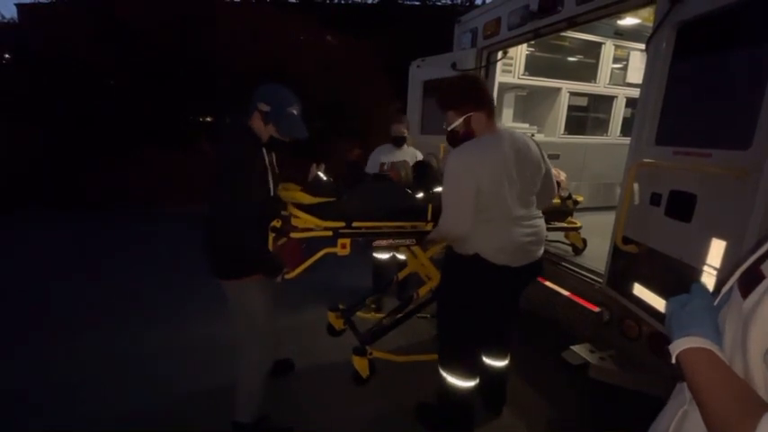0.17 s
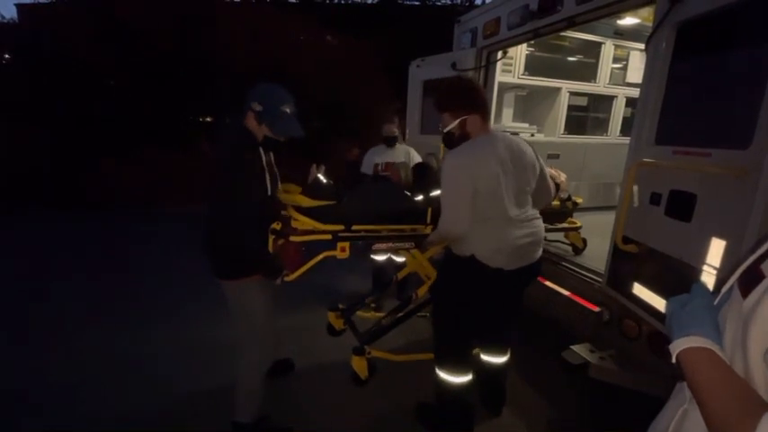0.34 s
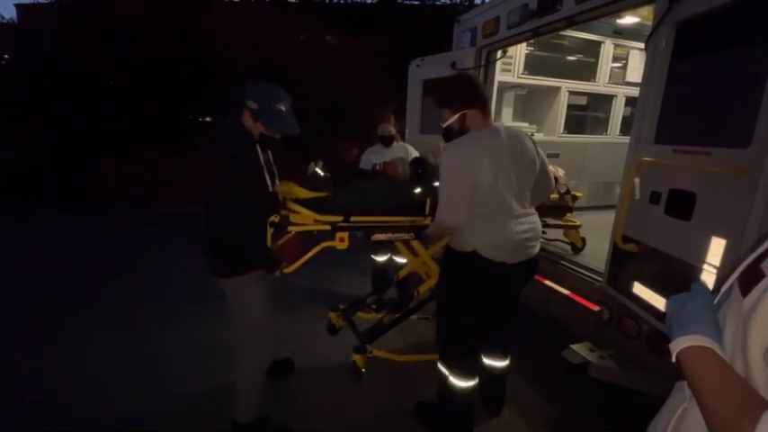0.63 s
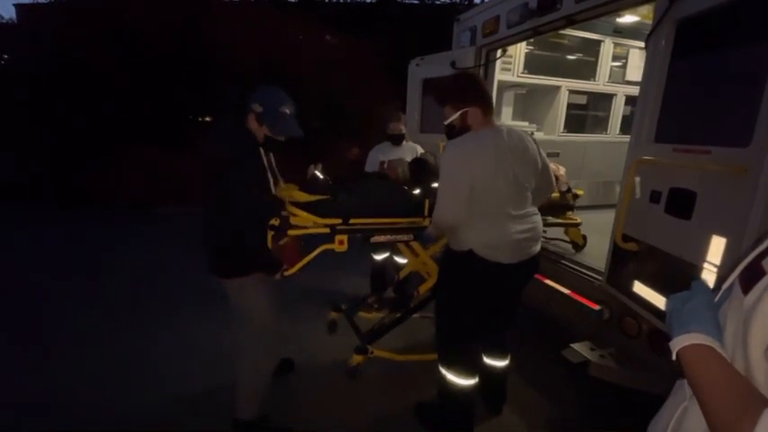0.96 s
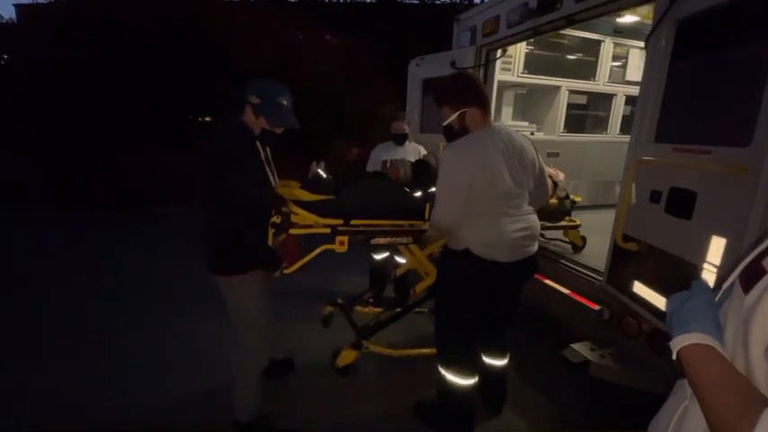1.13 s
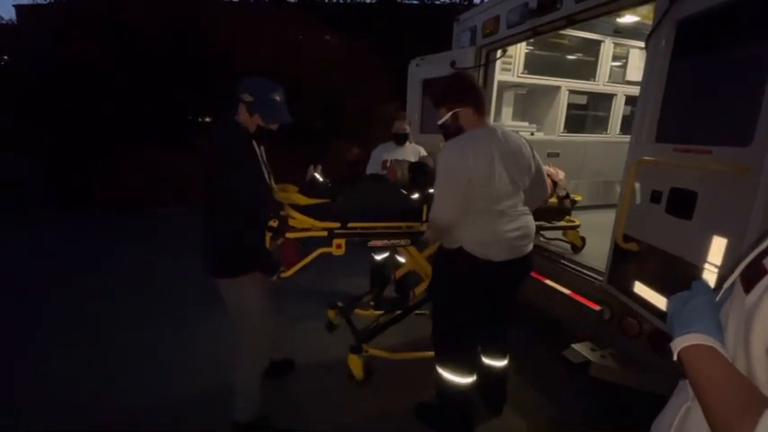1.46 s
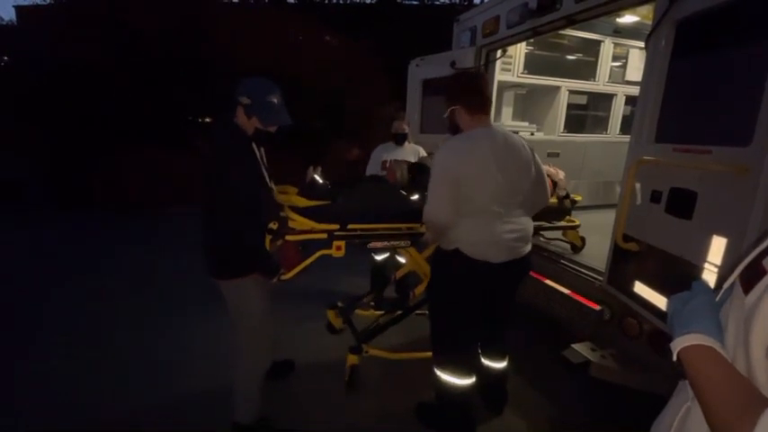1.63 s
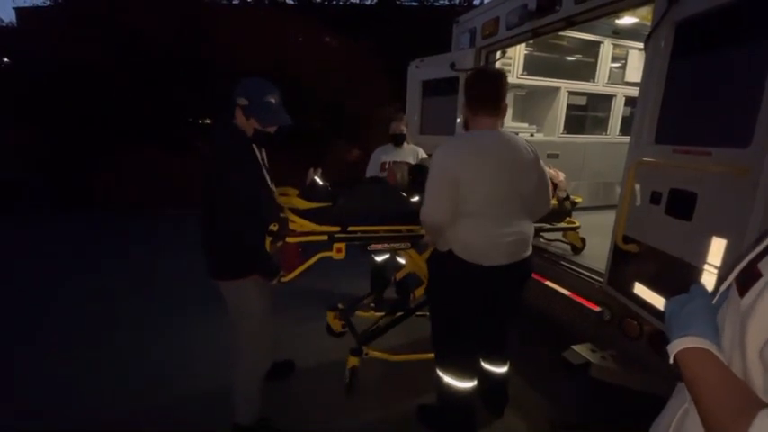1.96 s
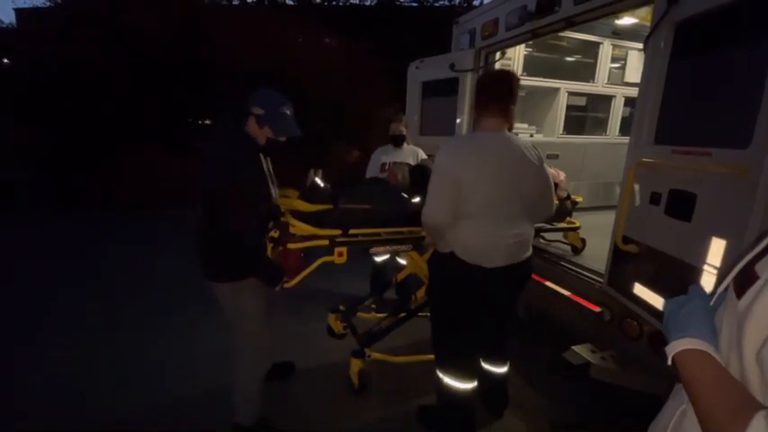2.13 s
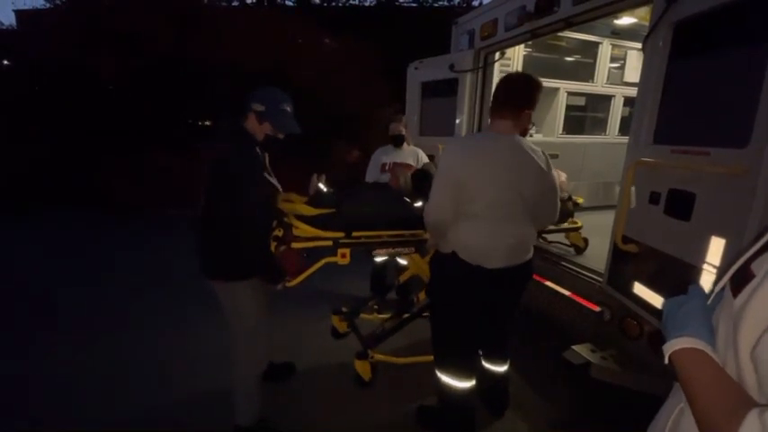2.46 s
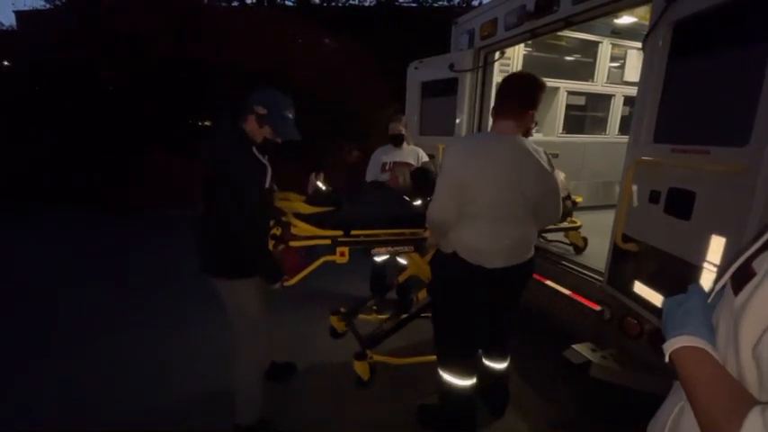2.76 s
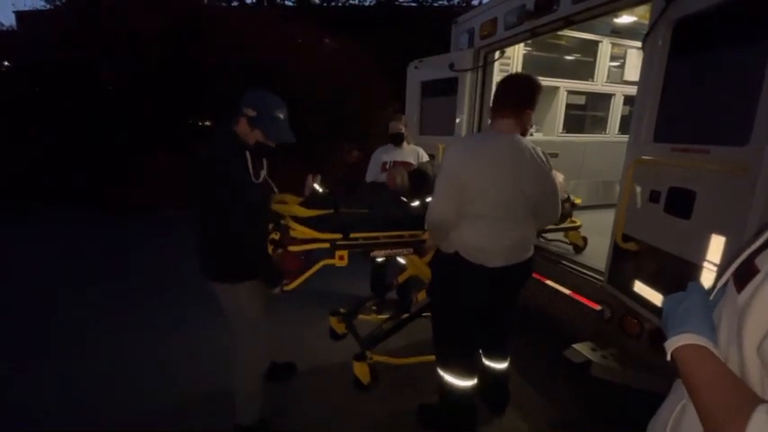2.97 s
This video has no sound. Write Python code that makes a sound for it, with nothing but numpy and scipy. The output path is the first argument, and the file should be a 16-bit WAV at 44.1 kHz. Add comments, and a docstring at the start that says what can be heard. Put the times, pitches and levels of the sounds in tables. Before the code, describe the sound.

A metal wheeled stretcher knocks lightly, then clatters heavily with clinks, short groans and a hollow thump; after a lull, a denser rattling burst follows. Outdoors by an open ambulance, close stereo microphone, low rumble.

```python
"""A wheeled metal stretcher is pushed into the back of an ambulance, over a low outdoor rumble throughout.
At first sparse knocks, each a run of contacts, excite the frame, its joints and tubes; light ticks are noise.
From about 0.5 s the knocks crowd; fittings clink on three modes, gliding tones groan, the hollow floor booms.
After a lull from 1.3 s the knocks return at 2 s in a dense burst that ends near 3 s.
Loose parts rattle under and between the knocks, and the open cabin adds a short tail to the frame's sound."""
import sys
import numpy as np
from scipy import signal
from scipy.io import wavfile

SR = 44100
rng = np.random.default_rng(int(sys.argv[2]) if len(sys.argv) > 2 else 0)


def inscribe(sig):
    """Save sig as 16-bit PCM at rate SR to the path in sys.argv[1].

    A 1-D sig is mono; a 2-D sig holds one channel per row.
    Samples are clipped to [-1, 1] before scaling.
    """
    pcm = np.round(np.clip(np.atleast_2d(sig).T, -1, 1) * 32767)
    wavfile.write(sys.argv[1], SR, pcm.astype(np.int16))


N = 136710   # length in samples

# Outdoor rumble spectrum. Each row: frequency in Hz, relative density in dB.
RUMBLE_SPECTRUM = [(25, -48), (50, -8), (80, 1), (110, -5.5), (160, -6), (300, -18), (600, -24.5),
                   (1400, -40), (3500, -49), (4760, -46.5), (6200, -63), (8200, -41.5), (10700, -61),
                   (14000, -72)]
# Stereo field. Each row: frequency in Hz, left-right correlation from 0 to 1, left minus right in dB.
STEREO_FIELD = [(39.3, 0.64, 1), (130, 0.91, -2), (404, 1, -1.5), (700, 0, 2), (1260, 0, 5.5),
                (2630, 0.77, -2.5), (3870, 0, 1), (6130, 0.25, 6), (8800, 0.092, -7.5), (11600, 0, 1.5)]
# Knocks of the frame. Each row: start in seconds, force in dB in the clack, thud, clank and click
# registers, swell time in seconds.
KNOCKS = [(0.0, -36, -36.5, -44, -45.5, 0.0019), (0.1931, -41, -34.5, -62, -88, 0.011),
          (0.266, -40.5, -48, -73, -65, 0.0019), (0.329, -39.5, -43.5, -72, -69, 0.002),
          (0.468, -41.5, -39.5, -41.5, -44.5, 0.0028), (0.5078, -37.5, -38, -35.5, -58, 0.0059),
          (0.5226, -35, -28, -36.5, -49, 0.019), (0.6486, -34, -30, -29, -55, 0.032),
          (0.6762, -29, -32.5, -26, -64, 0.0045), (0.6825, -29, -18.5, -31.5, -39.5, 0.0099),
          (0.7565, -61, -27, -70, -46.5, 0.0016), (0.787, -31.5, -44, -39.5, -42.5, 0.0056),
          (0.816, -52, -31, -33, -43, 0.0015), (0.8346, -28, -30, -31, -37.5, 0.011),
          (0.916, -20.5, -22, -21, -55, 0.0054), (0.9223, -19, -41, -27, -23.5, 0.0035),
          (1.0078, -25.5, -44, -43, -68, 0.007), (1.023, -40, -27, -34, -72, 0.004),
          (1.05, -28.5, -29, -26.5, -70, 0.0067), (1.0746, -31, -33, -33, -32, 0.0064),
          (1.0938, -27, -33.5, -31, -28, 0.0042), (1.1415, -38.5, -37, -34.5, -52, 0.0026),
          (1.253, -22.5, -32, -35, -52, 0.0034), (1.263, -33, -34, -34.5, -38, 0.0078),
          (2.041, -35.5, -43, -45.5, -38.5, 0.011), (2.087, -33, -43, -39.5, -67, 0.0026),
          (2.0984, -26.5, -27.5, -31.5, -32, 0.0035), (2.1206, -24.5, -26, -28, -42, 0.0063),
          (2.1362, -23.5, -29.5, -30.5, -26, 0.0028), (2.2178, -29, -29.5, -37.5, -39, 0.0081),
          (2.2525, -25, -59, -33, -64, 0.002), (2.2812, -30.5, -63, -40, -36, 0.0074),
          (2.3207, -29, -45, -36, -35, 0.0063), (2.3467, -23.5, -37, -35, -36.5, 0.003),
          (2.3602, -22, -24, -24.5, -37, 0.014), (2.38, -19.5, -24, -21, -21, 0.0033),
          (2.393, -40, -20.5, -24.5, -24, 0.00073), (2.436, -30.5, -40, -47, -39.5, 0.0028),
          (2.4863, -27, -29.5, -29, -35.5, 0.017), (2.561, -25.5, -48, -33, -35, 0.004),
          (2.58, -22, -36, -27, -33, 0.0029), (2.591, -30, -29.0, -31, -32, 0.0096),
          (2.6201, -19, -20.5, -20.5, -25, 0.003), (2.6256, -19.5, -17.5, -22.5, -24.5, 0.002),
          (2.6336, -36, -28, -24, -19.5, 0.0066), (2.7038, -32, -34.5, -29.5, -33.5, 0.0075),
          (2.73, -24.5, -31, -37, -50, 0.0027), (2.7392, -31, -38, -26, -35.5, 0.0054),
          (2.793, -25.5, -49, -42, -31, 0.0039), (2.81, -20, -30.5, -23.5, -32.5, 0.0045),
          (2.8384, -20.5, -25, -25.5, -28, 0.0025), (2.8418, -25.5, -21.5, -24, -21.5, 0.0092),
          (2.924, -25, -28, -31.5, -37.5, 0.03), (3.0134, -27.5, -32.5, -33.5, -41.5, 0.0054)]
# Loose rattle over time. Each row: time in seconds, level in dB before its colour.
RATTLE_LEVEL = [(0, -43), (0.15, -54.5), (0.43, -58), (0.6, -48), (1.15, -45.5), (1.47, -58.5),
                (1.9, -59.5), (2.2, -46), (2.75, -43), (3.1, -67)]
# Colour of the rattle. Each row: frequency in Hz, gain in dB.
RATTLE_COLOUR = [(200, 0.5), (1000, 2.5), (10000, -7.5)]
# Crowded modes of the frame. Each row: frequency in Hz, gain in dB, t60 in seconds, cabin tail in dB.
FRAME_RESPONSE = [(42.4, -22.5, 0.14, -6), (76, -15.5, 0.11, 4), (224, -8, 0.093, -2),
                  (320.7, -1.5, 0.041, -8), (462, -14.5, 0.035, 0.5), (640, -6, 0.073, -7),
                  (1200, -7, 0.04, -3.5), (1800, -12.5, 0.025, -2), (3900, -12.5, 0.05, 1),
                  (6200, -5.5, 0.019, -4), (10640, -7, 0.019, -3), (13500, -13, 0.031, -10)]
# Reverberation of the cabin. Each row: frequency in Hz, t60 in seconds.
CABIN_DECAY = [(200, 0.4), (12000, 0.25)]
# Ringing modes of the tubes. Each row: frequency in Hz, gain in dB, t60 in seconds.
TUBE_MODES = [(910, -49, 0.077), (1740, -17, 0.07), (2382, -12, 0.13), (3253, -16, 0.08),
              (4630, -14.5, 0.04), (4906, -14, 0.025), (6320, -21, 0.067), (7020, -15.5, 0.27)]
# Ticks of small buckles and catches. Each row: start in seconds, gain in dB.
TICKS = [(0.071, -32.5), (0.353, -36), (0.58, -32.5), (1.315, -35.5), (1.44, -37.5), (1.53, -47),
         (1.955, -41.5)]
# Clinks of latches and small fittings. Each row: start in seconds, pitch in Hz, gain in dB.
CLINKS = [(0.51, 3240, -29), (0.528, 2780, -37), (0.678, 3180, -23), (0.789, 1390, -31), (0.921, 2340, -17),
          (1.01, 3170, -25.5), (1.03, 3320, -26), (1.053, 3150, -23.5), (1.08, 4700, -31),
          (1.099, 4590, -22), (1.255, 2180, -20.5), (1.258, 1550, -21), (2.143, 4680, -24),
          (2.256, 1340, -23), (2.35, 1310, -18.5), (2.711, 4130, -22.5), (2.733, 1120, -22),
          (2.814, 1220, -15.5)]
# Judders of the loaded frame as it slides and slows. Each row: start in seconds, length in seconds,
# start pitch in Hz, end pitch in Hz, gain in dB.
JUDDERS = [(0.545, 0.041, 278.3, 262, -28.5), (0.681, 0.069, 209.2, 192, -12.5),
           (0.705, 0.033, 295, 270, -19.5), (0.719, 0.043, 134.6, 70, -18.5), (1.056, 0.11, 203, 198, -23)]
# Weight landing on the floor. Each row: centre of the push in seconds, push in dB, push time in seconds.
THUMPS = [(0.713, -23.5, 0.0037), (0.754, -32, 0.0011), (1.077, -24, 0.0022), (2.387, -34, 0.0038),
          (2.632, -30, 0.0051)]
# Modes of the hollow floor. Each row: frequency in Hz, gain in dB, t60 in seconds.
FLOOR_MODES = [(62.3, -4.5, 0.58), (100, 7.5, 0.075), (154.6, 0.5, 0.51), (201, -8.5, 0.29)]

BAND_EDGES_HZ = np.geomspace(25, 16000, 25)
RUMBLE_DB, RUMBLE_FLICKER_DB, RUMBLE_FLICKERS_PER_S = -41.5, 1, 10.12
THUD_HZ, CLACK_HZ, CLANK_HZ, CLICK_HZ = 278, 966, 3440, 8250   # centres of the four registers
CONTACTS_PER_S, CONTACT_SPREAD_DB = 1200, 1
MAIN_CONTACT_DB = 1   # above a typical contact, before the swell
KNOCK_REFERENCE_S = .01   # a run has the energy of unit rms over this time
RATTLE_PER_S = 430
COLOUR_SCATTER_DB, COLOUR_CHANGES_PER_S = 3, 110
JOINT_MODE_COUNT, JOINT_LOW_HZ, JOINT_HIGH_HZ = 26, 800, 11000
JOINT_DB, JOINT_T60_S = -2, .05   # level against the frame
TICK_BAND_HZ, TICK_T60_S = (2500, 11000), 0.08
CLINK_T60_S, CLINK_SPREAD = 0.04, 0.115   # spread: largest offset of the side modes, as a share of the pitch
JUDDER_OVERTONE_DB, JUDDER_RISE_SHARE, JUDDER_ROUGH_DB = -36, 0.17, 1.5
RIGHT_LAG_S = .00043
CEILING = .9
TOP_HZ, TOP_LOSS_DB, CUTOFF_HZ = 13290, -22.5, 16000


def from_db(db):
    """A level in decibels is twenty times the logarithm of the amplitude ratio returned."""
    return 10 ** (np.asarray(db) / 20)


def rms_one(x):
    """Division by the root mean square gives unit mean power."""
    return x / np.sqrt(np.mean(x ** 2) + 1e-20)


def unit_energy(x):
    """Division by the root of the summed squares gives each row unit energy."""
    return x / np.sqrt(np.sum(x ** 2, axis=-1, keepdims=True) + 1e-20)


def at_hz(table, hz):
    """A spectrum is interpolated on a logarithmic frequency axis, column by column."""
    f, *columns = np.transpose(table)
    return [np.interp(np.log(hz), np.log(f), c) for c in columns]


def dying(t, t60):
    """Damping makes amplitude decay exponentially, by 60 dB in t60."""
    return np.exp(-np.log(1000) * t / max(t60, 1e-3))


def linger(power, t60):
    """Stored energy leaks in proportion to itself, so power falls by 60 dB in t60."""
    keep = from_db(-120 / (max(t60, 1e-3) * SR))   # power ratio per sample
    return signal.lfilter([1 - keep], [1, -keep], power + 1e-18)


def waver(per_s):
    """Random drift: normal values, drawn at a given rate, are joined by straight lines."""
    return np.interp(np.arange(N) / SR * per_s, np.arange(SR // 10), rng.standard_normal(SR // 10))


def add(out, s, sound):
    """Superposition: a sound is summed into the mixture at its start time."""
    start = max(int(s * SR), 0)
    out[:, start:start + sound.shape[-1]] += sound[..., :N - start]


def band_noise(low, high, size):
    """Sum and difference of two independent noises set the correlation between the microphones."""
    alike, pan_db = at_hz(STEREO_FIELD, np.sqrt(low * high))
    alike = np.clip(alike, -1, 1)
    sides = np.array([[1], [-1]])
    sos = signal.butter(3, [low, high], "band", fs=SR, output="sos")
    settle = SR // 10   # the filter's onset is discarded
    mid, side = signal.sosfilt(sos, rng.standard_normal((2, size + settle)))[:, settle:]
    pair = np.sqrt(1 + alike) * mid + np.sqrt(1 - alike) * side * sides
    return rms_one(pair * from_db(sides * pan_db / 2))


def contacts(shape, per_s, spread_db):
    """Impacts occur independently at a mean rate, with random sign and uneven size."""
    born = rng.random(shape) < per_s / SR
    sign = np.sign(rng.random(shape) - .5)
    return born * sign * from_db(spread_db * rng.standard_normal(shape))


def struck(hz, gains, t60):
    """A struck body sounds as a sum of damped modes, each with its own phase at each microphone."""
    t = np.arange(SR // 20) / SR
    waves = np.sin(2 * np.pi * (hz[:, None] * t + rng.random((2, len(hz), 1)) / 2))
    return np.sum(gains[..., None] * waves, axis=1) * dying(t, t60)


def rumble():
    """Broadband noise, weighted band by band, forms a wavering low rumble with a faint hiss."""
    out = 0
    for low, high in zip(BAND_EDGES_HZ, BAND_EDGES_HZ[1:]):
        density_db = at_hz(RUMBLE_SPECTRUM, np.sqrt(low * high))[0]
        db = density_db + RUMBLE_FLICKER_DB * waver(RUMBLE_FLICKERS_PER_S)
        out = out + band_noise(low, high, N) * np.sqrt(high - low) * from_db(db)
    return from_db(RUMBLE_DB) * rms_one(out)


def knock_runs():
    """Chattering impact: contacts swell to one main contact and die away; one row of force per knock."""
    swell_s = np.maximum(np.array(KNOCKS)[:, -1:], 1e-3)
    age = (np.arange(SR // 5) + 1) / SR / swell_s   # in swell times
    runs = contacts(age.shape, CONTACTS_PER_S, CONTACT_SPREAD_DB)
    main = np.argmin(np.abs(age - 1), axis=1)
    runs[np.arange(len(runs)), main] = from_db(MAIN_CONTACT_DB)
    return unit_energy(runs * age * np.exp(-age)) * np.sqrt(KNOCK_REFERENCE_S * SR)


def knock_db(knock, hz):
    """The force spectrum of a knock is interpolated between its four registers."""
    _, clack, thud, clank, click, _ = knock
    centres_hz = [THUD_HZ, CLACK_HZ, CLANK_HZ, CLICK_HZ]
    return np.interp(np.log(hz), np.log(centres_hz), [thud, clack, clank, click])


def loose_rattle():
    """Loose parts make a steady random scatter of equal impacts under a slowly moving level."""
    level_db = np.interp(np.arange(N) / SR, *np.transpose(RATTLE_LEVEL))
    return rms_one(contacts((1, N), RATTLE_PER_S, 0)) * from_db(level_db)


def frame_force(runs):
    """Knocks and rattle superpose into one excitation, given as a function of frequency."""
    rattle = loose_rattle()

    def force(hz):
        out = rattle * from_db(at_hz(RATTLE_COLOUR, hz)[0])
        for knock, run in zip(KNOCKS, runs):
            add(out, knock[0], from_db(knock_db(knock, hz)) * run)
        return out
    return force


def frame(force):
    """Crowded modes act as noise bands that store energy, which then lingers in the cabin."""
    out = 0
    for low, high in zip(BAND_EDGES_HZ[1:], BAND_EDGES_HZ[2:]):
        hz = np.sqrt(low * high)
        db, t60, tail_db = at_hz(FRAME_RESPONSE, hz)
        # the mix of modes keeps changing
        favour = rms_one(from_db(COLOUR_SCATTER_DB * waver(COLOUR_CHANGES_PER_S)))
        body = linger((favour * force(hz)) ** 2, t60)
        tail = from_db(tail_db) ** 2 * linger(body, at_hz(CABIN_DECAY, hz)[0])
        out = out + from_db(db) * np.sqrt(body + tail) * band_noise(low, high, N)
    return out


def joints(runs):
    """Modal excitation: every knock lands on another joint, which rings briefly with its own modes."""
    out, steps = np.zeros((2, N)), np.arange(JOINT_MODE_COUNT)
    for knock, run in zip(KNOCKS, runs):
        place = (steps + rng.random(len(steps))) / len(steps)
        hz = JOINT_LOW_HZ * (JOINT_HIGH_HZ / JOINT_LOW_HZ) ** place
        pan_db = at_hz(STEREO_FIELD, hz)[1] * np.array([[1], [-1]]) / 2
        gains = from_db(JOINT_DB + knock_db(knock, hz) + at_hz(FRAME_RESPONSE, hz)[0] + pan_db)
        ring = signal.fftconvolve(struck(hz, gains, JOINT_T60_S), run[None], axes=1)
        strength = np.linalg.norm(gains, axis=1, keepdims=True) * np.linalg.norm(run)
        add(out, knock[0], unit_energy(ring) * strength)
    return out


def tubes(force):
    """Convolution of the frame's force with damped sines rings the tubes, phased apart per microphone."""
    t, out = np.arange(SR // 2) / SR, 0
    for hz, db, t60 in TUBE_MODES:
        wave = np.sin(2 * np.pi * (hz * t + rng.random((2, 1)) / 2))
        ring = unit_energy(wave * dying(t, t60))
        out = out + from_db(db) * signal.fftconvolve(force(hz), ring, axes=1)[:, :N]
    return out


def ticks():
    """A light, sharp contact radiates a bright band of noise that decays quickly."""
    out, t = np.zeros((2, N)), np.arange(SR // 10) / SR
    sos = signal.butter(1, TICK_BAND_HZ, "band", fs=SR, output="sos")
    for s, db in TICKS:
        crack = signal.sosfilt(sos, rng.standard_normal((2, len(t))))
        add(out, s, from_db(db) * crack * dying(t, TICK_T60_S))
    return out


def clinks():
    """Modal ringing: a struck fitting sounds briefly on three modes close around its pitch."""
    out = np.zeros((2, N))
    for s, hz, db in CLINKS:
        modes = hz * (1 + CLINK_SPREAD * np.array([-1, 0, 1]) * rng.uniform(0.65, 1, 3))
        gains = from_db(db) * np.array([.5, 1, .5])
        add(out, s, struck(modes, gains, CLINK_T60_S))
    return out


def judders():
    """Stick-slip of rubber under load: a short rough groan swells, sags in pitch and fades."""
    out = 0
    for s, length, start_hz, end_hz, db in JUDDERS:
        u = np.clip((np.arange(N) / SR - s) / length, 0, 1)   # share of the groan elapsed
        pitch_hz = start_hz + (end_hz - start_hz) * u ** 2
        phase = 2 * np.pi * np.cumsum(pitch_hz) / SR + 2 * np.pi * rng.random()
        rough = from_db(JUDDER_ROUGH_DB * waver(start_hz / 2))
        swell = np.minimum(u / JUDDER_RISE_SHARE, 1) * (1 - u) * rough
        tone = np.sin(phase) + from_db(JUDDER_OVERTONE_DB) * np.sin(2 * phase)
        out = out + from_db(db) * swell * tone
    return out


def floor_thumps():
    """Impulse response: soft pushes of the load, convolved with the floor's modes, set it booming."""
    t, push = np.arange(N) / SR, np.zeros(N)
    for s, db, push_s in THUMPS:
        pulse = np.exp(-np.pi * ((t - s) / push_s) ** 2)
        push += from_db(db) * pulse / pulse.sum()
    t = t[:SR // 2]
    boom = sum(from_db(db) * np.cos(2 * np.pi * hz * t) * dying(t, t60) for hz, db, t60 in FLOOR_MODES)
    return signal.fftconvolve(push, boom)[:N]


def scene():
    """Superposition of all sources; the whole mixture reaches the right microphone a little later."""
    runs = knock_runs()
    force = frame_force(runs)
    stretcher = frame(force) + joints(runs) + tubes(force) + ticks() + clinks() + judders()
    left, right = rumble() + stretcher + floor_thumps()
    lag = round(RIGHT_LAG_S * SR)
    return np.array([left, np.pad(right, (lag, 0))[:N]])


def record(dry):
    """Saturation rounds the peaks; low-pass filters lower the top treble, then cut it."""
    dry = CEILING * np.tanh(dry / CEILING)
    shelf = signal.ellip(8, .5, 60, min(TOP_HZ, CUTOFF_HZ), fs=SR, output="sos")
    dull = signal.sosfilt(shelf, dry)
    cut = signal.cheby2(12, 70, CUTOFF_HZ + 1000, fs=SR, output="sos")   # 70 dB down at this edge
    return signal.sosfilt(cut, dull + from_db(TOP_LOSS_DB) * dry)


dry = scene()
out = record(dry)
inscribe(out)
```